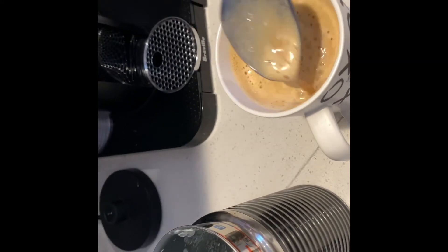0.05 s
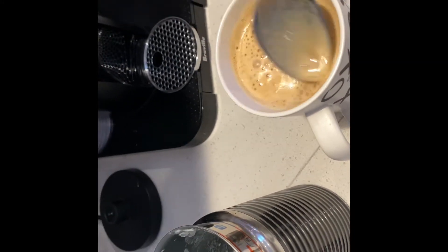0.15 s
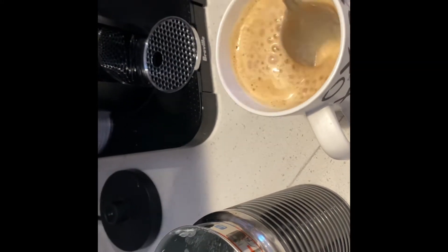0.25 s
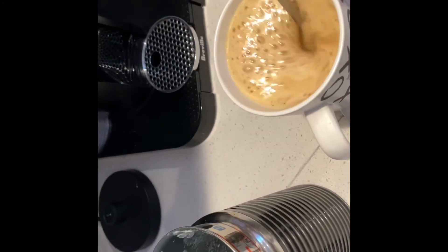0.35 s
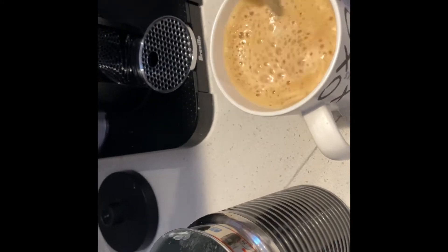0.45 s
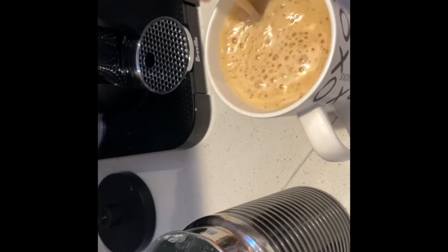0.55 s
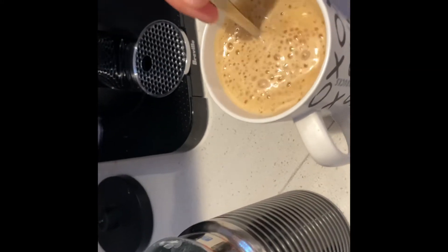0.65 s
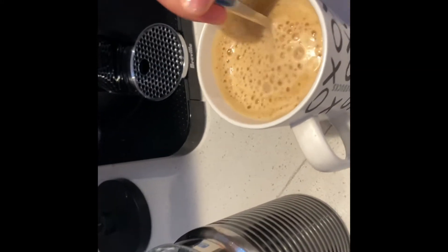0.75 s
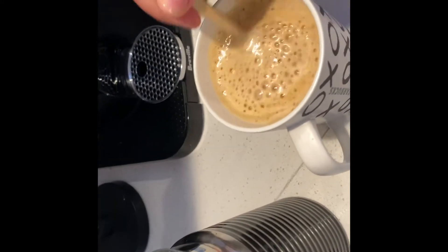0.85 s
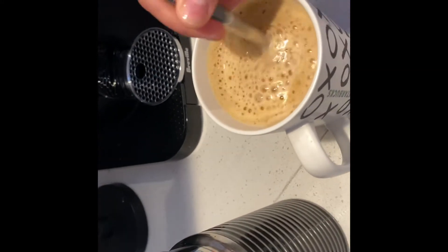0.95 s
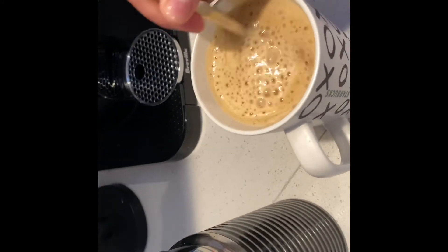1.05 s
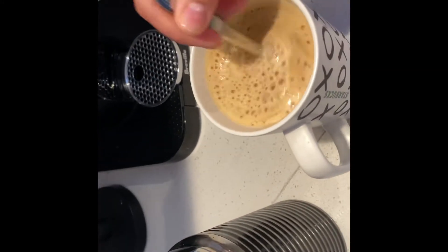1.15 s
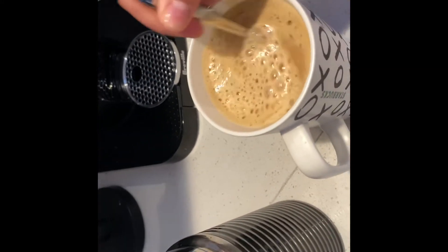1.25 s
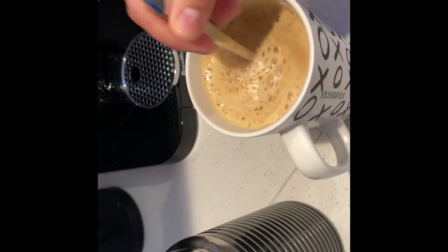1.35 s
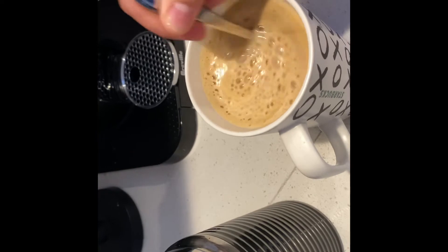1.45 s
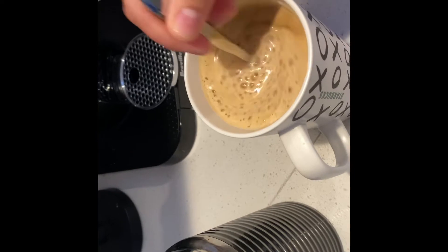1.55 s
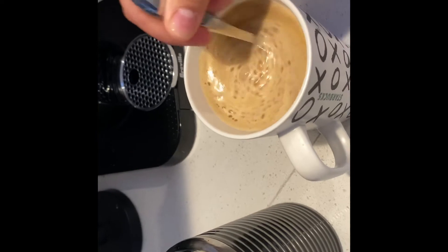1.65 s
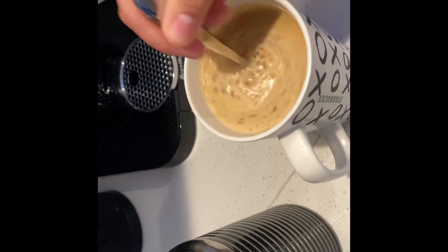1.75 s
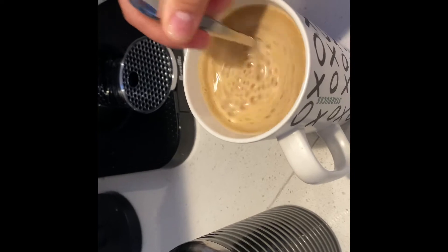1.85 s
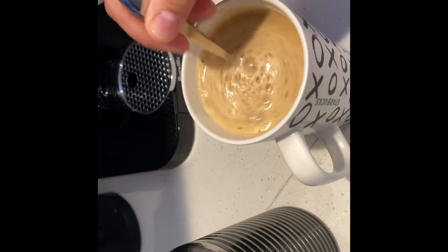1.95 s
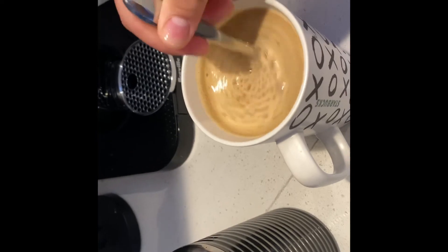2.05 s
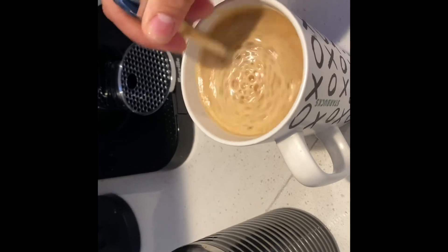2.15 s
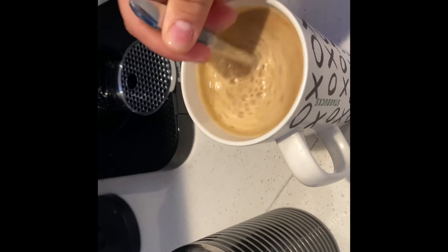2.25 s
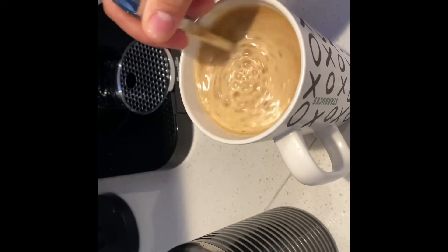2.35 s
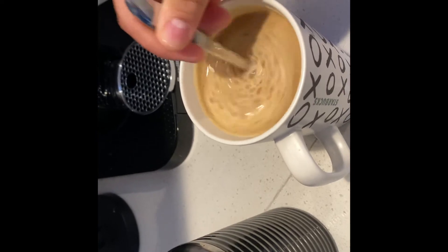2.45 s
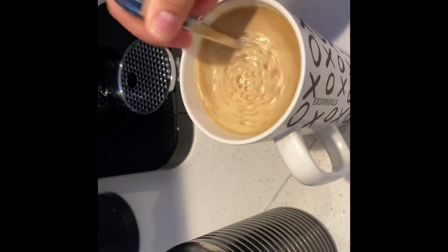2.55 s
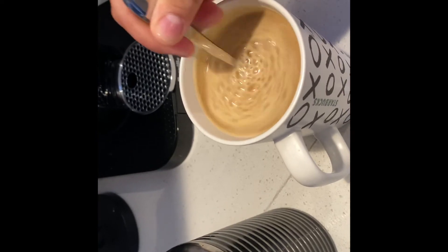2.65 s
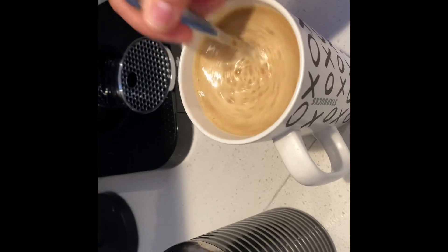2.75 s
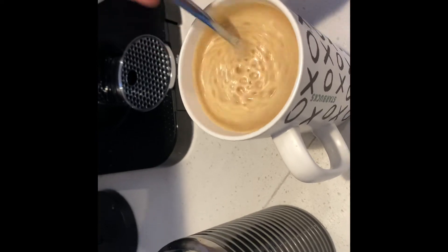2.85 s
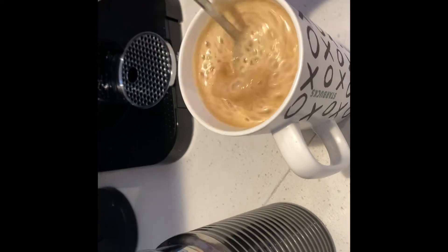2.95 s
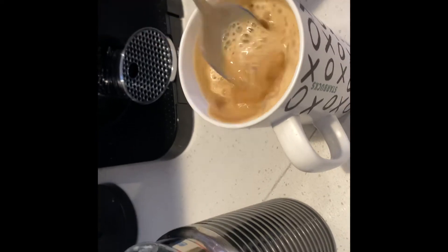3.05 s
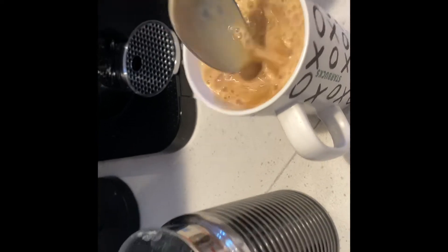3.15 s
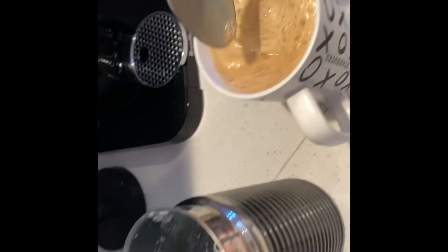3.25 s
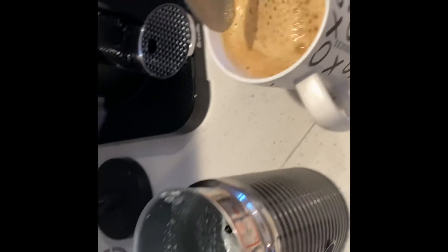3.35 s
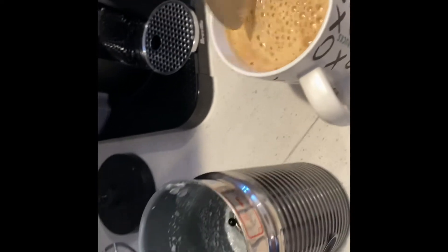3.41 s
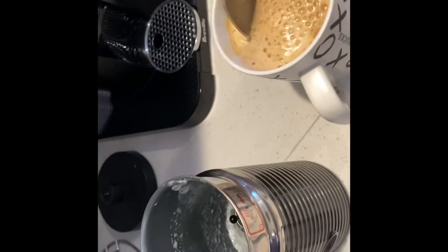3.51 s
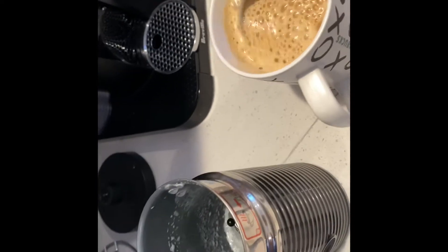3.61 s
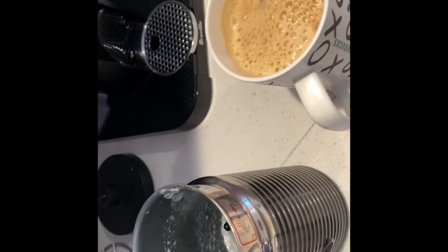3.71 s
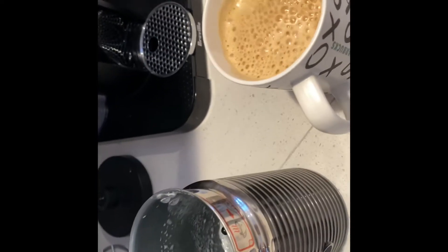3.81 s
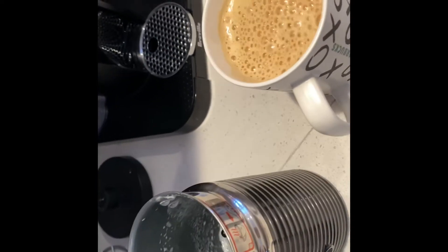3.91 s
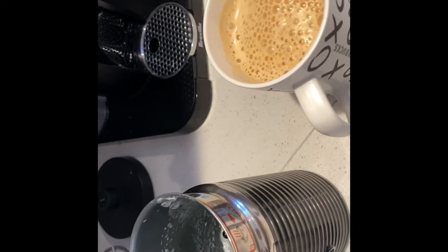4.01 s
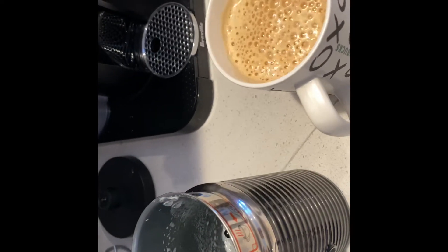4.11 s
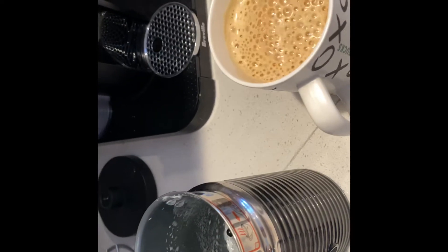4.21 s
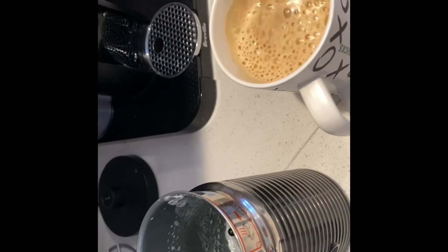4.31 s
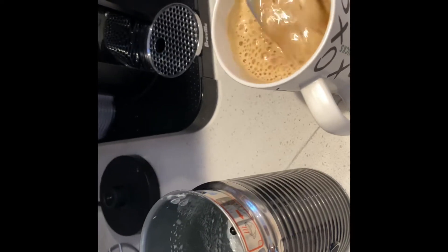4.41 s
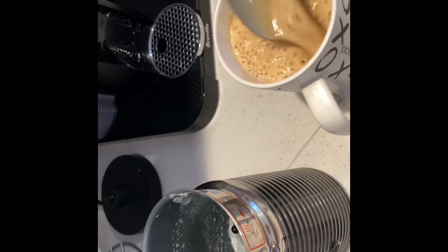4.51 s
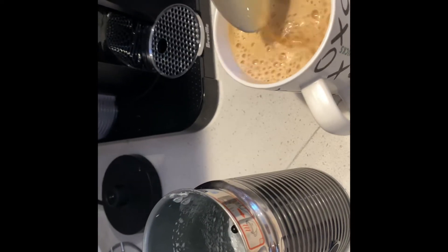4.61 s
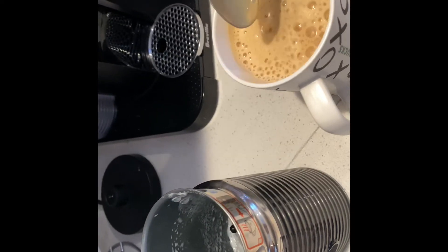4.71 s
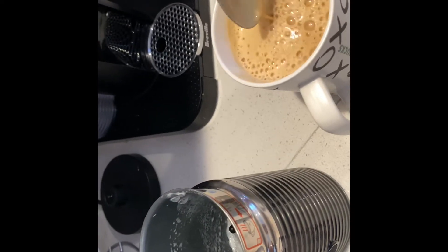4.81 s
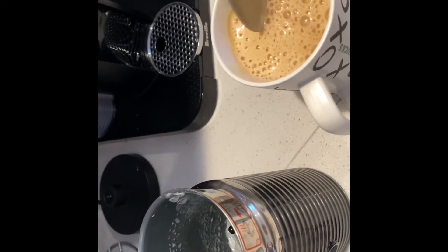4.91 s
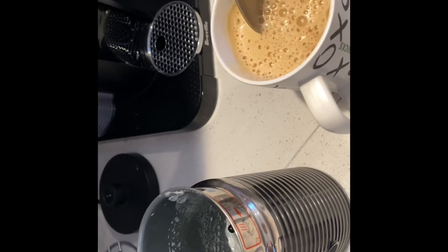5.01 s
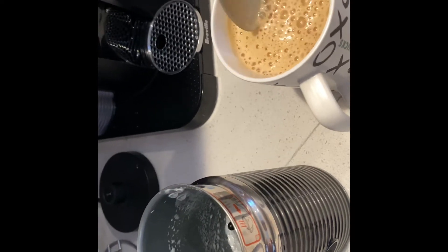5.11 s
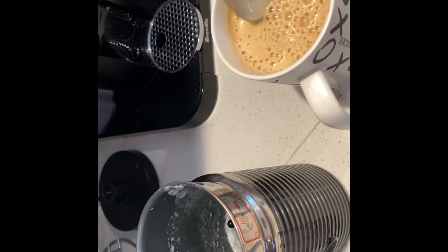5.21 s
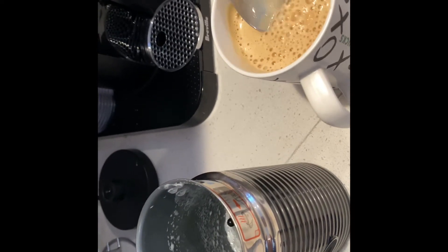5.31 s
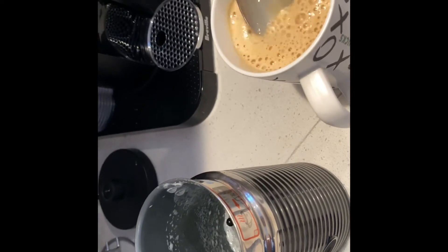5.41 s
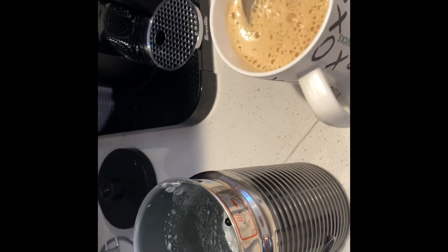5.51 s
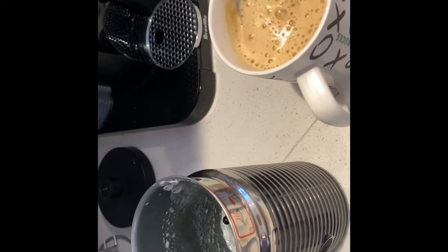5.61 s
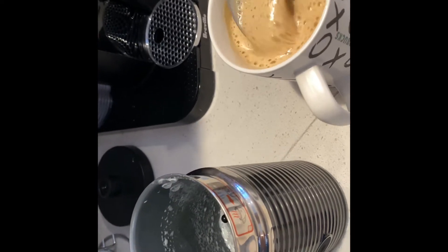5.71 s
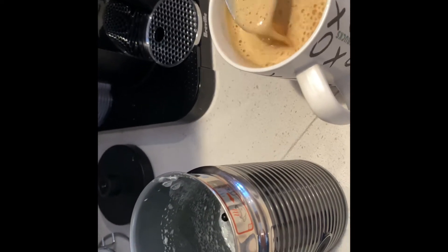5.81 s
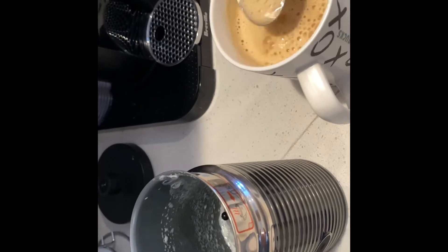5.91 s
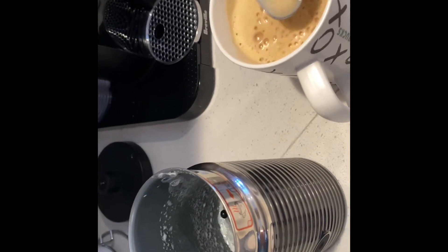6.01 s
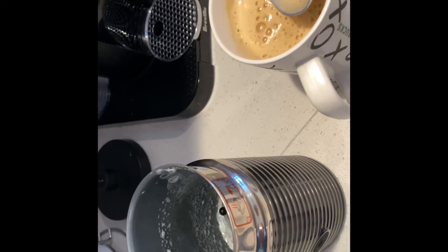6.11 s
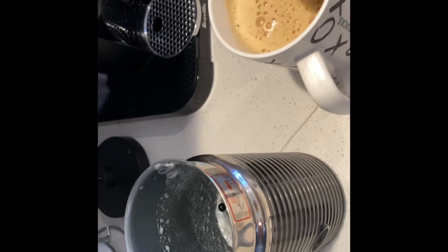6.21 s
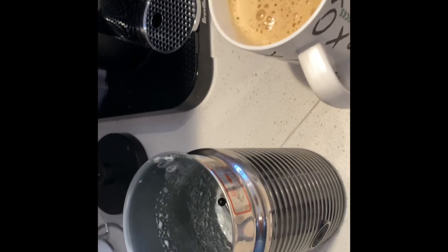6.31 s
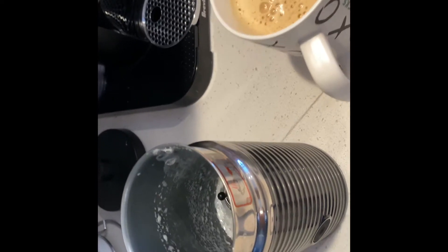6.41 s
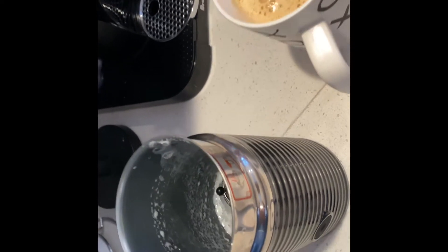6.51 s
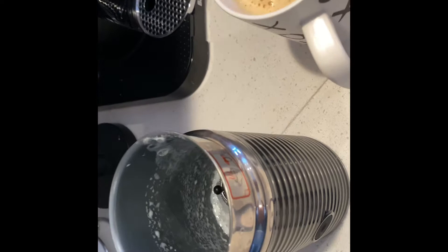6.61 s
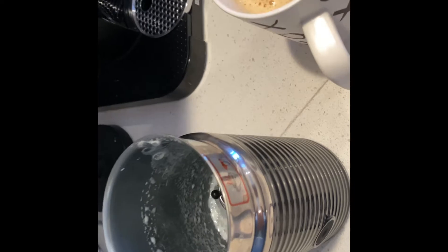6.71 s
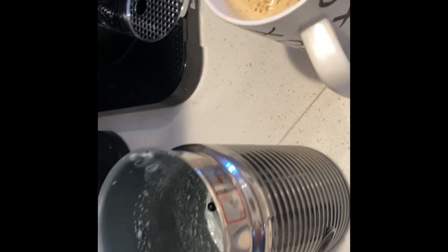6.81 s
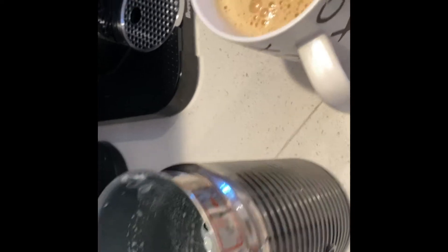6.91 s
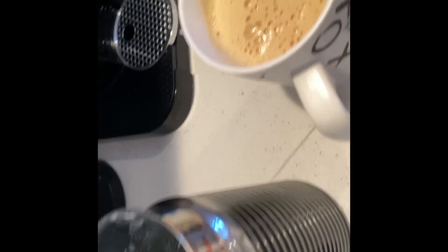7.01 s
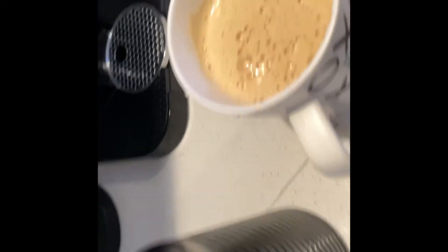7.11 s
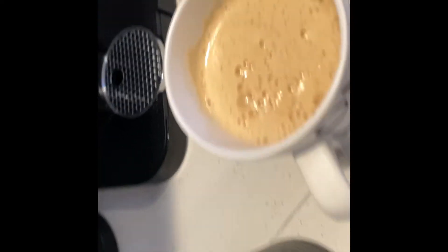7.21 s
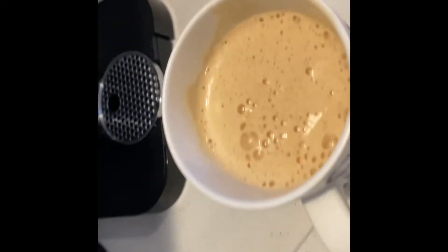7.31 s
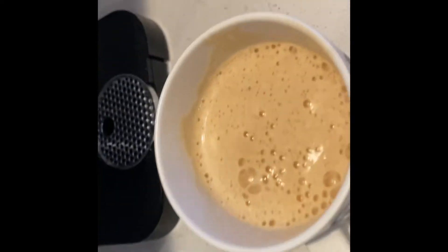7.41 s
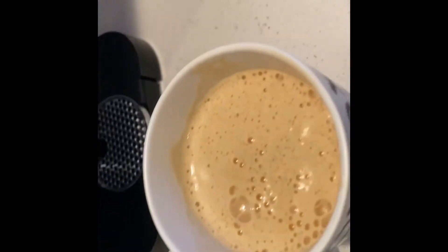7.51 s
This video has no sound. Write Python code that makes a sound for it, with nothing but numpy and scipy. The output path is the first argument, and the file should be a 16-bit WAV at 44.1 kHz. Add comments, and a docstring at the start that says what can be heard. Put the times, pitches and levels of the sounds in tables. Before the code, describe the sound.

A small kitchen with steady low appliance hum, a faint thin whine and soft hiss, heard from very close in stereo. From about 0.2 s a steel spoon starts stirring a full ceramic mug: a light clink, a dull knock near 0.45, a short drag at 0.55, then from 0.7 to 2.6 s a dense, uneven run of clinks, roughly five to ten contacts a second, with brief glides on the wall and liquid-damped knocks and skids on the bottom. Near-quiet follows, with barely audible ticks around 2.9-3.0. From 3.3 a low motor hum creeps upward, throbbing against the steady hum. At 3.75-4.05 come a knock, two clinks and a soft glaze scrape. Rim taps fall at 4.8 (faint), 5.1 and 5.9, the latter two brighter with a short metallic ring. The whine dims around 6.3; tiny ticks follow at 6.5, then a sharper click at 7.04 and a soft rustle until 7.4.

```python
"""A steel spoon stirs frothy coffee in a ceramic mug on a kitchen counter, close to a pair of microphones.
It clinks and glides on the wall, knocks and skids on the bottom, drags over the glaze and taps the rim three times.
Random contact forces excite the resonances of mug and spoon; the lifted spoon rings as decaying sinusoids.
Handling ticks and a rustle are band-passed noise. In the small reverberant room, shaped noise makes the air
and wavering sinusoids the appliances; one motor speeds up."""
import sys
import numpy as np
from scipy import signal
from scipy.fft import rfft, irfft, next_fast_len
from scipy.io import wavfile

SR = 44100
rng = np.random.default_rng(int(sys.argv[2]) if len(sys.argv) > 2 else 0)


def to_wav(s):
    """Save 16-bit WAV."""
    ch = np.atleast_2d(s).T  # columns
    pcm = np.round(np.clip(ch, -1, 1) * 32767)  # PCM
    wavfile.write(sys.argv[1], SR, pcm.astype(np.int16))


N = 333290
TIME = np.arange(N) / SR
PADDED = next_fast_len(N + 4096, True)
MUG_HZ = np.fft.rfftfreq(4096, 1 / SR)


def amp(db):
    """Logarithmic level: converts decibels to an amplitude ratio."""
    return 10 ** (np.asarray(db) / 20)


def unit(x):
    """Normalization: scales a signal to rms 1."""
    return x / np.sqrt(np.mean(x ** 2) + 1e-30)


def read(table, hz, axis=1):
    """Interpolation: reads one column of a table on a log-frequency axis."""
    columns = np.transpose(table)
    return np.interp(np.log(hz + 1), np.log(columns[0] + 1), columns[axis])


def add(mix, s, sound):
    """Superposition: adds a stereo sound to the mix at s seconds."""
    part = mix[:, round(s * SR):][:, :sound.shape[1]]
    part += sound[:, :part.shape[1]]


def band(x, lo_hz, hi_hz, order=3):
    """Causal filtering: a Butterworth band-pass."""
    edges = [lo_hz, min(hi_hz, SR / 2 - 100)]
    return signal.sosfilt(signal.butter(order, edges, "band", fs=SR, output="sos"), x)


def drift(rate_hz, size):
    """Random modulation: a wander of rms 1, interpolated between Gaussian values."""
    at = np.arange(size) * 2 * rate_hz / SR
    knots = int(at[-1]) + 2
    return unit(np.interp(at, np.arange(knots), rng.standard_normal(knots)))


# spectral density of the room noise: f/Hz, level/dB per Hz
ROOM_NOISE = [(20, -93.5), (40, -77.5), (80, -70), (150, -89.5), (230, -77.5), (310, -80.5), (450, -90),
              (800, -99), (1200, -102.5), (2000, -103), (6500, -101), (10500, -104), (12000, -113),
              (13500, -127)]


def air():
    """Stationary noise: white noise shaped in frequency gives steady room rumble and hiss."""
    hz = np.fft.rfftfreq(PADDED, 1 / SR)
    white = rfft(rng.standard_normal((2, PADDED)))
    return irfft(white * amp(read(ROOM_NOISE, hz)) * np.sqrt(SR / 2), PADDED)[:, :N]


# steady appliance tones: f/Hz, rms level/dB before the stereo gain, depth of wavering (at most 0.3 is used)
APPLIANCE_TONES = [(59.3, -44.5, 0.25), (53.8, -61, 0.16), (110.4, -59, 0.098), (119.2, -60.5, 0.58),
                   (772, -76.5, 0.24), (1188.8, -72.5, 0.53)]


def hum(dim_s=6.3, dim_db=-5):
    """Modulated tones: sinusoids of slowly wandering amplitude and phase form the appliance hum."""
    out = np.zeros(N)
    dimming = amp(np.interp(TIME, [dim_s, dim_s + 0.2], [0, dim_db]))
    for k, (hz, db, depth) in enumerate(APPLIANCE_TONES):
        waver = 1 + min(depth, .3) * drift(6.7, N)
        if k == len(APPLIANCE_TONES) - 1:
            waver = waver * dimming  # only the highest whine dims
        phase = 2 * np.pi * (hz * TIME + rng.random()) + hz / 1200 * drift(11.0, N)
        out += amp(db) * waver * np.sin(phase)
    return np.sqrt(2) * out


# broad response of mug and spoon: f/Hz, level/dB
BROAD_COLOUR = [(40, -16.5), (100, -3.5), (190, -5.5), (330, -5), (550, -3), (800, -2), (1200, -3.5),
                (1700, -6), (2500, -6.5), (3450, -16), (5000, -17), (6200, -15), (7250, -18), (9500, -15.5),
                (15500, -31.5)]


def broad_response():
    """Minimum phase: the Hilbert transform of the log gain makes the smooth colour causal."""
    log_gain = np.log(amp(read(BROAD_COLOUR, np.r_[MUG_HZ, MUG_HZ[-2:0:-1]])))
    return np.exp(signal.hilbert(log_gain).conj())[:len(MUG_HZ)]


# resonances of the filled mug with the spoon in it: f/Hz, width/Hz, level/dB over the broad response
MUG_MODES = [(95.4, 63, -1.5), (266.3, 27, 5), (364, 50, 8), (482, 20, -5.5), (728, 28, 5), (854, 16, -1.5),
             (984, 13, -7), (1092, 41, -0.5), (1184, 52, 8), (1253, 56, 1), (1562, 18, -3), (1734, 31, -7),
             (1860, 90, -3.5), (2196, 29, 3), (2322, 38, 2.5), (2440, 60, 2), (2666, 90, -4),
             (2894, 32, 0.5), (3998, 58, 14.5), (4500, 24, 8), (4610, 32, 16)]
# resonances of the spoon, damped by fingers and drink: f/Hz, width/Hz, level/dB over the broad response
HELD_SPOON_MODES = [(4975, 140, 15), (5130, 150, 12.5), (5430, 130, 14.5), (5910, 146, 16),
                    (6230, 170, 13.5), (6480, 130, 13.5), (6880, 59, 10.5), (7740, 110, 6), (8080, 96, 6.5),
                    (8560, 170, 6.5), (9000, 260, 6.5), (9340, 220, 9.5), (10180, 130, 5),
                    (10520, 130, 7.5), (12370, 380, 15), (13900, 400, 6.5)]


def mug_response(slosh=0.0041, grip=0.012):
    """Modal superposition: the contact place weights the modes; liquid detunes the mug, grip the spoon."""
    hz, width, db = np.transpose(MUG_MODES + HELD_SPOON_MODES)[:, :, None]
    place_db = 3.3  # standard deviation of the weighting
    place, detune = rng.standard_normal((2, len(hz), 1))
    spread = np.where(np.arange(len(hz)) < len(MUG_MODES), slosh, grip)[:, None]
    mode_hz = hz * (1 + spread * detune)
    modes = amp(db + place_db * place) / (1 + 1j * ((MUG_HZ - mode_hz) * (2 / width)))
    # the far wall throws each contact back after a delay that depends on where the spoon is
    echo_delay_s = rng.uniform(.0002, .0009)
    echo = 1 + .35 * np.exp(-2j * np.pi * MUG_HZ * echo_delay_s)
    response = irfft(broad_response() * echo * (1 + modes.sum(0)))
    fade = np.minimum(np.linspace(2, 0, len(response)), 1) ** 2
    return response * fade


def travelling(forces):
    """Moving excitation: the travelling contact meets a new weighting of the modes at each patch."""
    patch_s = .028  # time to reach a new patch of the wall
    size, hop = forces.shape[-1], round(patch_s * SR)
    out = np.zeros(forces.shape[:-1] + (size + 4095,))
    for centre in range(0, size + hop // 2, hop):
        at = np.arange(max(centre - hop, 0), min(centre + hop, size))
        piece = forces[..., at] * np.cos(np.pi / 2 * (at - centre) / hop)  # power crossfade
        sound = signal.fftconvolve(piece, mug_response()[None, None], axes=-1)
        out[..., at[0]:at[0] + sound.shape[-1]] += sound
    return out


def contact(low_force, high_force, top_hz, wall_db, sing_db, span_s, thud_db, body_db, bright_db):
    """Forced vibration: forces sound the modes in five registers, each with a set rms over the first span_s.
    The glazed wall sings at sing_db against the steel."""
    low, high = travelling(np.array([low_force, high_force]))
    # the upper wall modes lie between the body and the steel contact, in pitch and in level
    upper_db = (2 * body_db + 3 * bright_db) / 5
    thud_lag_s = 0.004028  # the counter follows the mug a little late
    thud = np.roll(band(low, 58.9, 392, order=4), round(thud_lag_s * SR), axis=1)
    parts = [
        (thud, thud_db),
        (band(low, 437, 1580), body_db),
        (band(high, 1607, 3470), upper_db + wall_db),
        (band(high, 3810, 4750), bright_db + sing_db),
        (band(high, 4910, top_hz, order=6), bright_db)]
    shortest_s = .016
    span = round(max(span_s, shortest_s) * SR)
    return sum(amp(db) * x / np.sqrt(np.mean(x[:, :span] ** 2)) for x, db in parts)


def chatter(t, rise_s, bounce_s, after_db, after_s):
    """Impact noise: a brief noise burst for the bounces, then decaying scatter from the cup and counter."""
    bounces = np.exp(-(t / bounce_s) ** 2)
    scatter = amp(after_db) * np.exp(-t / after_s)
    envelope = (1 - np.exp(-t / rise_s)) * (bounces + scatter)
    return rng.standard_normal((2, len(t))) * envelope


def blow(thud_db, body_db, bright_db, top_hz=15800, wall_db=-5.0, sing_db=-13.0):
    """Impact excitation: a dull knock shakes the mug for longer than a bright clink."""
    t = np.arange(SR // 12) / SR
    dullness = np.clip((body_db - bright_db) / 14, 0, 1)
    low = chatter(t, rise_s=0.001, bounce_s=0.0063, after_db=2.0, after_s=0.0089 + 0.0023 * dullness)
    high = chatter(t, rise_s=0.00083, bounce_s=0.0027, after_db=2.5, after_s=0.0064)
    cushioned_hz = top_hz - 2000 * dullness  # liquid softens the contact
    return contact(low, high, cushioned_hz, wall_db, sing_db, .025, thud_db, body_db, bright_db)


def scrape(length_s, thud_db, body_db, bright_db, spread_db=2, judder_db=4.0, top_hz=13400,
           wall_db=0.5, sing_db=-8.0, fizz_db=-5.0, slope_db=0):
    """Stick-slip friction: dense tiny impacts bunched by judder, with harder catches at uneven gaps.
    The pressure changes by slope_db over the stroke."""
    size = max(round(length_s * SR), 256)
    slips_per_s = 5000
    catches_per_s, catch_db = 120, -6.5  # mean rate, and level against the fine slips
    slip_level_db = spread_db * np.minimum(rng.exponential(1, size), 4)
    slips = (rng.random(size) < slips_per_s / SR) * amp(slip_level_db)
    catch_at = np.cumsum(rng.uniform(.3, 1.7, 64)) * SR / catches_per_s
    catches = np.isin(np.arange(size), catch_at.astype(int)) * np.sqrt(SR / catches_per_s) * amp(catch_db)
    pressure_db = judder_db * drift(66.48, size) + np.linspace(0, slope_db, size)
    pressure = signal.windows.tukey(size, .2) * amp(pressure_db)
    fine_force = unit(slips) * rng.standard_normal((2, size))
    catch_force = catches * rng.choice([-1, 1], (2, size))
    force = pressure * (fine_force + catch_force)
    fizz = amp(fizz_db) * band(force, 9700, 10000, order=2)  # the finest slips on the glaze
    return contact(force, force + fizz, top_hz, wall_db, sing_db, length_s, thud_db, body_db, bright_db)


# clinks on the wall, each with a glide: t/s, mug body level/dB, hardness (steel contact over body)/dB,
# glide length/s, glide level against the clink/dB
CLINKS_AND_GLIDES = [(0.2388, -42, -3, 0.0092, -17), (0.403, -27.5, -6, 0.015, -14.5),
                     (0.6187, -34, 0.5, 0.0066, -26), (0.7282, -24.5, -1.5, 0.011, -16),
                     (0.766, -45, 8, 0.0095, -17), (0.8352, -24, 1, 0.081, -20),
                     (0.957, -23.5, 1.5, 0.096, -18), (1.0735, -36, 4, 0.015, -6),
                     (1.1701, -21, -2, 0.1, -22.5), (1.29, -37.5, -1.5, 0.0066, -21),
                     (1.38, -21, -0.5, 0.1, -19), (1.5005, -34.5, 0.5, 0.0079, -22),
                     (1.6065, -21, 0, 0.1, -18.5), (1.7131, -34, -2, 0.0099, -13),
                     (1.8142, -25, 1, 0.1, -17), (1.913, -31.5, 2.5, 0.01, -7),
                     (1.929, -28.5, 7.5, 0.0066, -10), (2.0284, -24, -0.5, 0.085, -21),
                     (2.16, -29.5, 1.5, 0.058, -12.5), (2.2543, -20.5, -1, 0.086, -20),
                     (2.4669, -23.5, -1.5, 0.01, -16), (2.5999, -35, 1.3, 0.01, -14),
                     (3.808, -28.5, 0.5, 0.0145, -31), (3.8599, -32, -2.5, 0.0058, -18.5)]


def clinks():
    """Impact, then friction: strikes on the wall, each followed by a light glide along it."""
    out = np.zeros((2, N))
    thud_at_0_db, thud_slope = -29.5, 0.3  # counter thud at a strength of 0 dB, dB per dB of strength
    glide_wait_s, glide_hardness_db, glide_thud_db = .017, -6.5, -4.5
    for s, strength_db, hardness_db, glide_s, press_db in CLINKS_AND_GLIDES:
        thud_db = thud_at_0_db + thud_slope * strength_db
        add(out, s, blow(thud_db, strength_db, strength_db + hardness_db))
        glide_db = strength_db + press_db
        # rich in fine, high slips, easing off as the spoon leaves
        glide = scrape(glide_s, glide_db + glide_thud_db, glide_db, glide_db + glide_hardness_db,
                       wall_db=0.0, sing_db=-2.0, fizz_db=0, slope_db=-4.5)
        add(out, s + glide_wait_s, glide)
    return out


# kitchen reverberation: f/Hz, 60 dB decay time/s
KITCHEN_DECAY = [(150, 0.67), (800, 0.37), (2500, 0.36), (6000, 0.22), (14000, 0.051)]


def kitchen(x, wet_db=-17):
    """Diffuse reverberation: convolves with decaying noise that builds up over the first reflections."""
    t = np.arange(SR // 2) / SR
    hz, frame_s, z = signal.stft(rng.standard_normal((2, len(t))), SR, nperseg=256)
    decay = amp(-60 * frame_s / read(KITCHEN_DECAY, hz)[:, None])
    tail = signal.istft(z * decay, SR, nperseg=256)[1][:, :len(t)]
    tail *= 1 - np.exp(-t / 0.00087)
    return amp(wet_db) * signal.fftconvolve(x, tail / np.linalg.norm(tail[0]), axes=1)[:, :N]


# knocks on the bottom, each with a skid: t/s, mug body level/dB, hardness (steel contact over body)/dB,
# skid length/s
KNOCKS_AND_SKIDS = [(0.455, -21.5, -15, 0.036), (1.0248, -28.5, -10.5, 0.035), (1.1009, -33.5, -4.5, 0.041),
                    (1.2219, -28.5, -18, 0.027), (1.253, -29.5, -12, 0.02), (1.3207, -33, -2, 0.032),
                    (1.4251, -27, -15, 0.037), (1.461, -28.5, -11.5, 0.024), (1.5195, -29.5, -7, 0.03),
                    (1.548, -35, -3.5, 0.025), (1.6732, -29.5, -15.5, 0.017), (1.689, -32.5, -17.5, 0.024),
                    (1.7407, -30.5, -7, 0.027), (1.955, -27, -3, 0.026), (2.1214, -21.5, -11.5, .016),
                    (2.3323, -27.5, -14, 0.026), (2.498, -22.5, -12, 0.044), (2.88, -53, -34, 0.0057),
                    (3.7408, -31, -13, 0.014), (4.047, -46, -21, 0.008), (4.454, -54, -12, 0.0098)]


def knocks():
    """Impact, then friction: dull landings on the bottom, each running on into a skid."""
    out = np.zeros((2, N))
    # thud at 0 dB, dB per dB of strength, dB per dB of hardness
    thud_at_0_db, thud_slope, thud_per_hardness = -7, 0.87, 0.26
    skid_thud_db, skid_body_db, skid_bright_db = -5, -5.5, -7  # skid against its knock
    for s, strength_db, hardness_db, skid_s in KNOCKS_AND_SKIDS:
        thud_db = thud_at_0_db + thud_slope * strength_db + thud_per_hardness * hardness_db
        bright_db = strength_db + hardness_db
        add(out, s, blow(thud_db, strength_db, bright_db, wall_db=-8.0, sing_db=-9.0))
        skid = scrape(skid_s, thud_db + skid_thud_db, strength_db + skid_body_db,
                      bright_db + skid_bright_db, wall_db=-4.0, sing_db=-2.5)
        add(out, s, skid)
    return out


# slow drags over the glaze: start t/s, end t/s, mug body level/dB, hardness/dB, ring of the upper wall/dB
GLAZE_DRAGS = [(0.541, 0.618, -33.5, -10, -4), (3.835, 3.952, -37, -13, -1), (3.924, 4.05, -37, -11.5, 0)]


def drags():
    """Sustained friction: the spoon is drawn slowly over the glaze."""
    out = np.zeros((2, N))
    thud_db = -6  # against the strength
    for start, end, db, hardness_db, wall_db in GLAZE_DRAGS:
        drag = scrape(end - start, db + thud_db, db, db + hardness_db, spread_db=2.0, judder_db=1.5,
                      wall_db=wall_db, sing_db=-5.0, fizz_db=0.0, slope_db=0.8)
        add(out, start, drag)
    return out


# small ticks away from the mug: t/s, ring level/dB, ring f/Hz, ring decay constant/s, crack level/dB
HANDLING_TICKS = [(2.8805, -54, 2700, .009, -60), (3.0336, -56, 1900, .009, -58),
                  (6.527, -53, 2200, .014, -52), (6.641, -51, 2700, .014, -64),
                  (6.9979, -48, 4300, .017, -45), (7.0403, -36, 3100, .006, -32),
                  (7.1162, -50, 2350, .012, -72), (7.228, -61, 3300, .012, -54)]


def handling(crack_s=0.0083, ring_width_hz=550, grain_db=2.0):
    """Filtered noise: ticks, each a crack with a brief ring, and a grainy rustle."""
    out, t = np.zeros((2, N)), np.arange(SR // 20) / SR
    for s, ring_db, hz, ring_s, crack_db in HANDLING_TICKS:
        ring, crack = rng.standard_normal((2, 2, len(t)))
        ring = unit(band(ring, hz - ring_width_hz / 2, hz + ring_width_hz / 2, order=2)) * np.exp(-t / ring_s)
        crack = unit(band(crack, 360, 13200, order=3)) * np.exp(-t / crack_s)
        add(out, s, amp(ring_db) * ring + amp(crack_db) * crack)
    rustle_start_s, rustle_length_s, rustle_db = 7.04, 0.33, -55
    low_db = 8  # low body of the rustle against its brush
    size = round(rustle_length_s * SR)
    brush = rng.standard_normal((2, size)) * amp(grain_db * drift(88.4, size))
    rub = band(brush, 1700, 4000, order=2) + amp(low_db) * band(brush, 220, 850, order=2)
    swell = np.sin(np.linspace(0, np.pi, size))
    add(out, rustle_start_s, amp(rustle_db) * unit(rub) * swell)
    return out


# a motor speeding up: t/s, f/Hz, rms level/dB before the stereo gain
MOTOR_RISE = [(3.3, 61.5, -54), (3.751, 63.6, -41.5), (4.299, 66, -45.5), (5.199, 67, -41),
              (5.901, 68.4, -44), (6.798, 70.3, -49.5), (7.55, 72.8, -43)]


def motor():
    """Interference: a rising sinusoid beats ever faster against the strongest appliance tone."""
    s, hz, db = np.transpose(MOTOR_RISE)
    level = amp(np.interp(TIME, s, db)) * np.clip((TIME - s[0]) * 10, 0, 1)
    phase = 2 * np.pi * np.cumsum(np.interp(TIME, s, hz)) / SR
    return np.sqrt(2) * level * np.sin(phase)


# modes of the spoon in the air: f/Hz, 60 dB decay time/s, level/dB at the first, second, third contact place
FREE_SPOON_MODES = [(2336, .24, -22, -24, -17), (2660, .24, -36, -30, -25), (3768, .085, -2, -6, -22),
                    (4015, .08, -20, -16, -4), (4304, .078, -4, 6.5, 4.5), (5380, .06, 4, -7, -2),
                    (6420, .045, -3, 4, 2), (6800, .045, -6, 0, 6), (8440, .055, 1, -2, -3),
                    (10760, .06, -12, -11, -4)]


def spoon_ring(db, place, second_view_db=-4):
    """Free vibration: decaying modes, weighted by contact place, shiver slightly in the fingers."""
    t = np.arange(SR // 3) / SR
    shiver_hz, shiver_db, shiver_rad = 110, 2, .28
    ring = np.zeros(len(t))
    for hz, t60, *levels in FREE_SPOON_MODES:
        level_db = levels[place] - 60 * t / t60 + shiver_db * drift(shiver_hz, len(t))
        phase = 2 * np.pi * (hz * t + rng.random()) + shiver_rad * drift(shiver_hz, len(t))
        ring += amp(level_db) * np.sin(phase)
    return np.sqrt(2) * amp(db) * np.array([ring, amp(second_view_db) * ring])


# the lifted spoon taps the rim: t/s, thud level/dB, mug body level/dB, bright steel contact level/dB,
# ring level of the free spoon/dB
TAPS_ON_RIM = [(4.8311, -54, -36, -44, -48), (5.101, -44, -36.5, -35, -34), (5.91, -40, -35, -30.5, -29)]


def rim_taps(clack_db=-4, clack_s=0.0098):
    """Impact and free vibration: the lifted spoon strikes the rim, clacks and rings freely."""
    out, t = np.zeros((2, N)), np.arange(SR // 15) / SR
    for place, (s, *levels, ring_db) in enumerate(TAPS_ON_RIM):
        add(out, s, blow(*levels, top_hz=12000, wall_db=-1.0, sing_db=-14.0))
        add(out, s, spoon_ring(ring_db, place))
        noise = rng.standard_normal((2, len(t)))
        clack = unit(band(noise, 400, 5600, order=2)) * np.exp(-t / clack_s)
        add(out, s, amp(ring_db + clack_db) * clack)
    return out


# the microphone pair: f/Hz, left-right likeness (0-1), lag of the left/rad, left minus right level/dB
MICROPHONE_PAIR = [(100, 1, 0, 1), (300, .97, 0, 1), (520, .68, .15, -.3), (800, .55, .7, -1),
                   (1200, .72, .48, -3), (1900, .45, .9, -2), (2700, .35, 2.1, -2), (4100, .5, 1.2, -.7),
                   (5200, .92, 2.95, 1), (6300, .975, 3.02, .3), (9000, .97, 2.93, .4),
                   (14000, .95, 2.8, 0)]


def ports(x):
    """Coherence: two views of the field become a pair, alike in the bass and opposed in the treble."""
    hz, (a, b) = np.fft.rfftfreq(PADDED, 1 / SR), rfft(x, PADDED)
    same = np.clip(read(MICROPHONE_PAIR, hz), 0, 1)
    lag = read(MICROPHONE_PAIR, hz, axis=2)
    balance_db = read(MICROPHONE_PAIR, hz, axis=3)
    right = (same * a + np.sqrt(1 - same ** 2) * b) * np.exp(1j * lag)
    return irfft(np.array([a * amp(balance_db / 2), right * amp(-balance_db / 2)]), PADDED)[:, :N]


def scene(direct_db=-2.5):
    """Direct and reverberant fields: taps and handling in the open reach the kitchen more than stirring."""
    inside = clinks() + knocks() + drags()
    outside = handling() + rim_taps()
    room = kitchen(inside, wet_db=-17.0) + kitchen(outside, wet_db=-16.0)
    field = amp(direct_db) * (inside + outside) + room + air()
    appliances = (hum() + motor()) * amp(0) * np.array([[1], [1]])
    return ports(field) + appliances * amp([[.7], [-.7]])  # slightly louder on the left


def record(dry):
    """Band limiting: a linear-phase low-pass removes the highest treble."""
    cutoff_hz = 16300
    lowpass = signal.firwin(511, cutoff_hz, window=("kaiser", 9), fs=SR)
    return signal.oaconvolve(dry, lowpass[None], "same")


dry = scene()
out = record(dry)
to_wav(out)
```